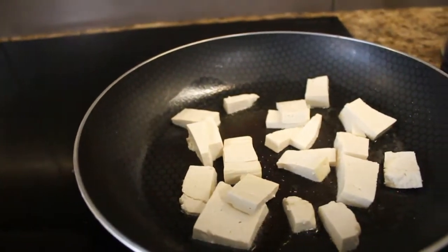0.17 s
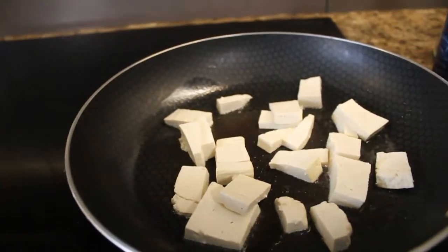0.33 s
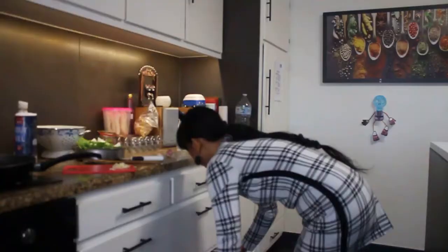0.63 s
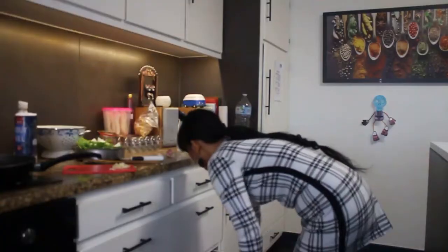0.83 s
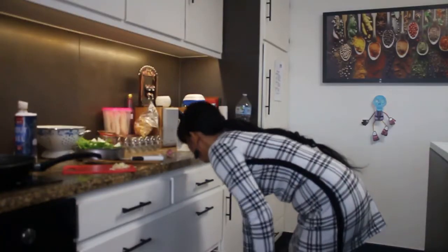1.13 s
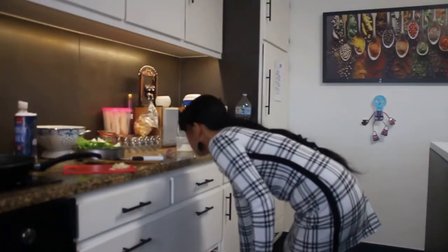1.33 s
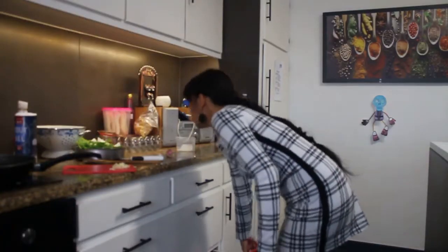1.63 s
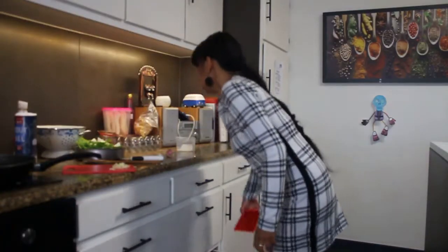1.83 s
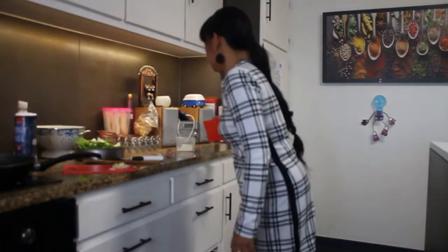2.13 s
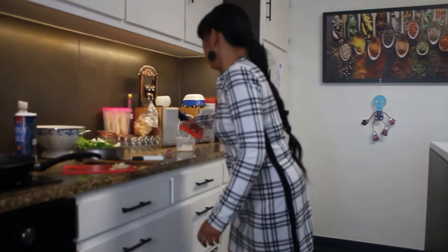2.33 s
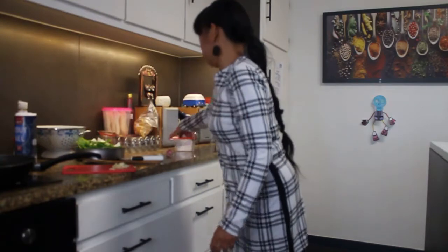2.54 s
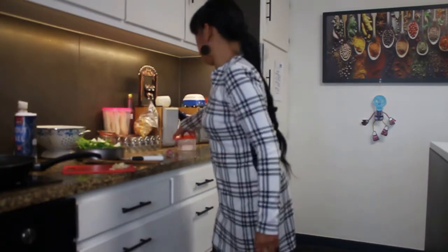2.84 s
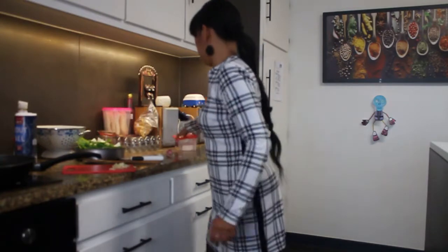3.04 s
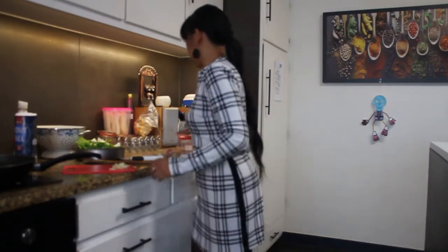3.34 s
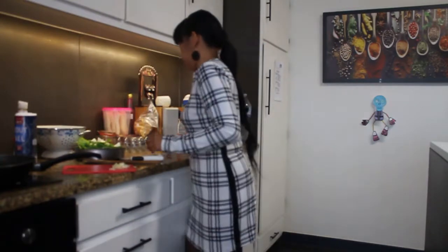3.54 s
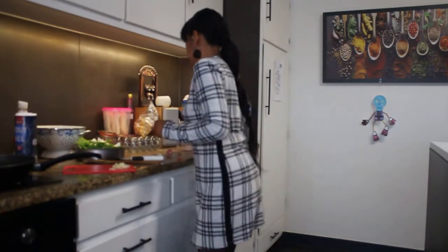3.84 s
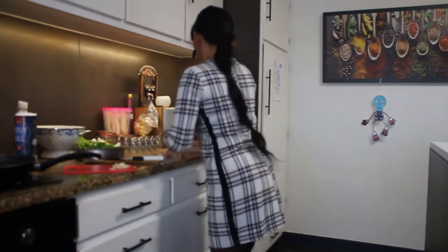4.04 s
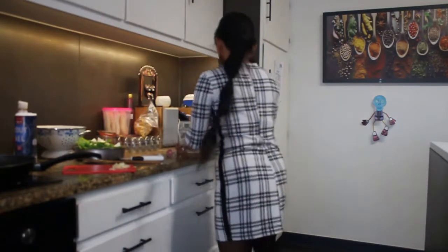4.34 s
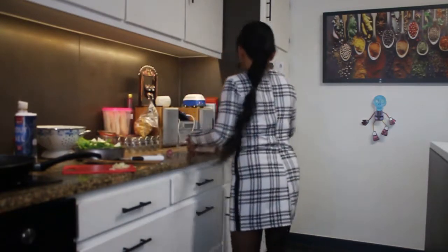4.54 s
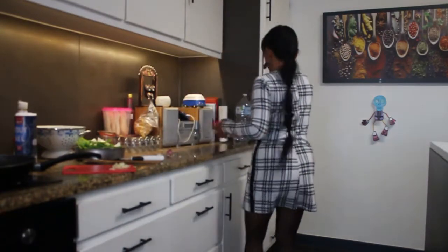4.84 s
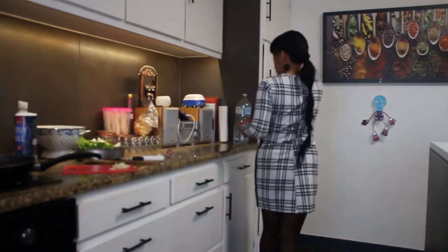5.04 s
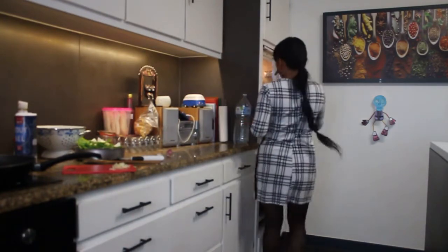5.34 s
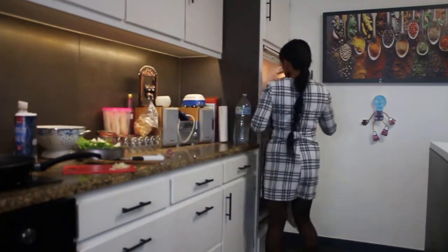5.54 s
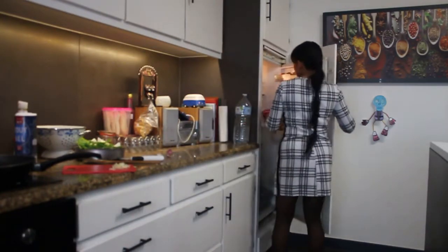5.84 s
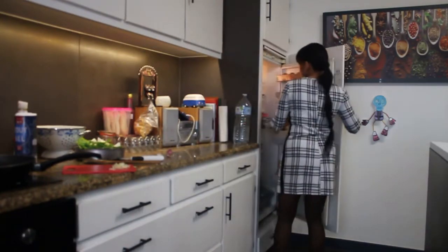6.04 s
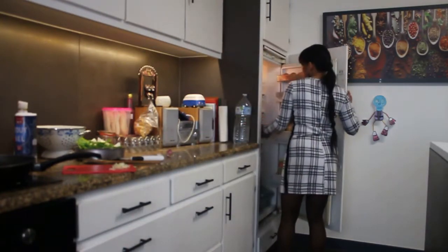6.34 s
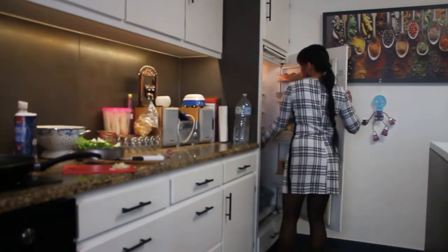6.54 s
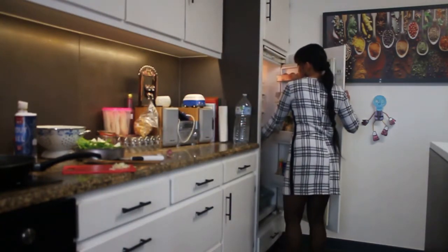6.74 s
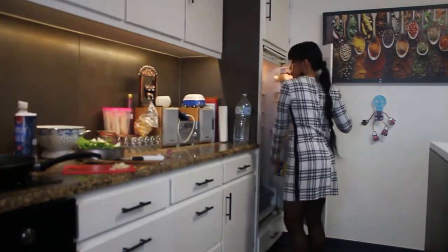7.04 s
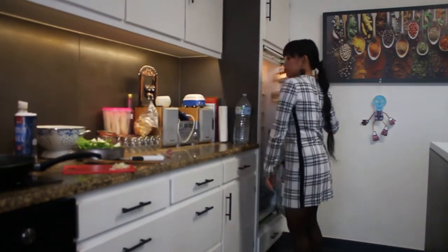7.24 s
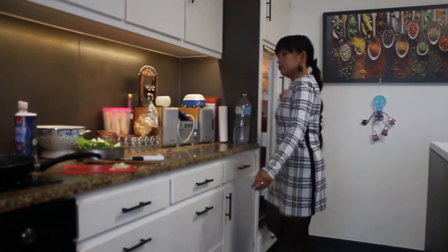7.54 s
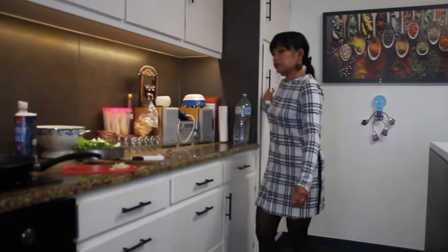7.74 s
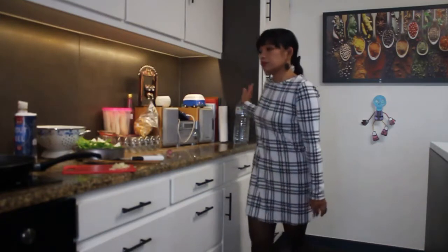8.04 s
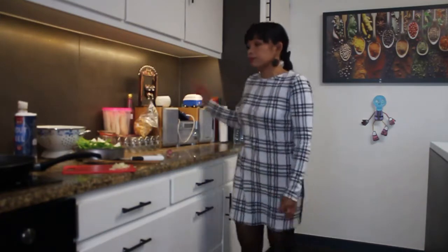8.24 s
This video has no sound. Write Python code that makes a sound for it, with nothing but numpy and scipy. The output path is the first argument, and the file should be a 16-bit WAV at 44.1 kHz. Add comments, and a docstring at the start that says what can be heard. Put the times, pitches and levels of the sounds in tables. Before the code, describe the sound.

Close frying gives way to a soft pan hiss while drawers roll, things clatter on a counter and a refrigerator door thumps shut.

```python
"""A hard-walled kitchen, one microphone feeding both channels. It starts close to tofu frying in oil,
where steam bubbles burst and spit, then the scene jumps to the far side of the room. From there the pan
is a soft hiss. Drawers roll, things are rummaged and set down on ringing wood, cutlery tinkles, and a
refrigerator door is opened and slammed, all echoed by the walls. The refrigerator hums throughout."""
import sys
import numpy as np
from scipy import signal
from scipy.fft import rfft, irfft, next_fast_len
from scipy.io import wavfile

SR = 44100
rng = np.random.default_rng(int(sys.argv[2]) if len(sys.argv) > 2 else 0)


def to_wav(s):
    """Save 16-bit WAV."""
    ch = np.atleast_2d(s).T  # columns
    pcm = np.round(np.clip(ch, -1, 1) * 32767)  # PCM
    wavfile.write(sys.argv[1], SR, pcm.astype(np.int16))


N = 369508
T = np.arange(N) / SR


def from_db(db):
    """Decibels as an amplitude gain."""
    return 10 ** (np.asarray(db) / 20)


def rms_one(x):
    """Scaled to rms 1."""
    return x / np.sqrt(np.mean(x ** 2) + 1e-20)


def peak_one(x):
    """Scaled to peak 1."""
    return x / np.abs(x).max()


def in_time(points):
    """A curve of (time_s, value) read at every sample."""
    return np.interp(T, *np.transpose(points))


def at_hz(points, hz):
    """A curve of (frequency_hz, value) read on a log frequency axis."""
    points_hz, values = np.transpose(points)
    return np.interp(np.log(hz + 1), np.log(points_hz), values)


def equalise(x, spectrum):
    """Filter by a curve of (frequency_hz, gain_db)."""
    size = next_fast_len(N)
    gain = from_db(at_hz(spectrum, np.fft.rfftfreq(size, 1 / SR)))
    return irfft(rfft(x, size) * gain, size)[..., :N]


def colour(x, spectrum):
    """Dense sound shaped by a spectrum; rms 1."""
    return rms_one(equalise(x, spectrum))


def drift(rate_hz):
    """A slow random wander; rms about 1."""
    step, settle = 40, 2000
    pole = np.exp(-2 * np.pi * rate_hz * step / SR)
    noise = rng.standard_normal(N // step + settle + 2)
    slow = signal.lfilter([1], [1, -2 * pole, pole * pole], noise)[settle:]
    return np.interp(np.arange(N) / step, np.arange(len(slow)), rms_one(slow))


def ring(x, hz, t60):
    """One mode: a unit click starts a dying sine of height 1."""
    r, w = from_db(-60 / (t60 * SR)), 2 * np.pi * hz / SR
    return signal.lfilter([0, np.sin(w)], [1, -2 * r * np.cos(w), r * r], x + 1e-18)


def band(x, low_hz, high_hz):
    """Band-pass."""
    return signal.sosfilt(signal.butter(2, [low_hz, high_hz], "band", fs=SR, output="sos"), x)


def noise_band(hz, width_hz):
    """Narrow noise, heard as a wavering tone or rumble; rms 1."""
    return rms_one(band(rng.standard_normal(N), hz - width_hz / 2, hz + width_hz / 2))


def grains(per_s, spread_db):
    """Random clicks of uneven size; rms 1."""
    sizes = from_db(spread_db * np.minimum(rng.exponential(1, N), 5)) * rng.choice([-1, 1], N)
    return rms_one(sizes * (rng.random(N) < per_s / SR))


def burst(t60, size=4000, rise_s=0):
    """Noise that builds up briefly, then dies away."""
    t = T[:size]
    rise = np.minimum((t + 1 / SR) / (rise_s + 1 / SR), 1)
    return rng.standard_normal(size) * rise * from_db(-60 * np.maximum(t - rise_s, 0) / t60)


def add(out, s, sound):
    """Mix a short sound in at s seconds."""
    at = round(s * SR)
    out[at:at + len(sound)] += sound[:N - at]


# The refrigerator's low tone, heard from both positions; the peak near 3.7 s is a low thump that joins it:
# time_s, level_db
HUM_LEVEL = [(0, -54), (.7, -43), (1.1, -74), (2.2, -58), (3.4, -54), (3.7, -33), (4.4, -57.5),
             (5.6, -47.5), (6.6, -52.5), (8.38, -43.5)]


def refrigerator_hum():
    """The compressor gives a wavering low tone and a faint buzz above it."""
    low = from_db(in_time(HUM_LEVEL)) * noise_band(59.3, width_hz=19)
    buzz = from_db(-63) * noise_band(320, width_hz=2.7)
    return low + buzz


# The pan from across the room, slowly calming: time_s, level_db
FAR_PAN_LEVEL = [(0.65, -33), (2.3, -34), (4.1, -36), (8.38, -36)]
# Its hiss and the room noise at that distance: frequency_hz, gain_db
FAR_PAN_SPECTRUM = [(53, -44), (90, -9.5), (266, -4.5), (330, -4.5), (783, -3.5), (1020, -1), (1320, 0),
                    (1820, -3), (2120, -1.5), (3890, 1), (5490, 4.5), (10700, 0), (15900, -7.5)]


def far_pan():
    """Distance blurs the sizzle into a softly flickering hiss over the room noise."""
    hiss = rng.standard_normal(N)
    crackle = grains(per_s=1200 * from_db(5.7 * drift(2.5)), spread_db=5.5)
    level_db = in_time(FAR_PAN_LEVEL) + 1.4 * drift(8.7)
    return from_db(level_db) * colour(hiss + 0.33 * crackle, FAR_PAN_SPECTRUM)


# The decay between the hard walls, before it steepens: frequency_hz, initial_t60_s
KITCHEN_DECAY = [(100, 1), (260, 0.52), (700, 0.64), (1840, 1), (4850, 0.68), (12000, 0.38)]


def kitchen_reverb(x):
    """The walls return a dense tail, dying band by band, just after the direct sound."""
    t, white, tail = T[:SR], rng.standard_normal((2, SR)), 0
    for k, low_hz in enumerate(40 * 2. ** np.arange(0, 8.6, .5)):
        t60 = at_hz(KITCHEN_DECAY, low_hz)
        half_octave = band(white[k % 2], low_hz, np.sqrt(2) * low_hz)
        tail = tail + half_octave * from_db(-60 * t / t60) / np.sqrt(t60)
    tail *= np.clip((t - .004) / 0.0077, 0, 1)   # first reflections arrive after 4 ms
    tail *= from_db(-153 * t ** 2)   # the tail falls faster as it ages
    return from_db(-2) * signal.fftconvolve(x, tail / np.sqrt(np.sum(tail ** 2)))[:N]


# Drawers rolling and things rummaged across the room:
# start_s, length_s, wood_db, fade_db_per_s, rumble_re_wood_db, rattle_re_wood_db, crinkle_re_wood_db
RUMMAGE_BOUTS = [(0.641, 0.17, -24, 15, -16, -8.5, -12.5), (0.831, 0.33, -28, 39, -8, -3.5, -11),
                 (1.2, 0.14, -36.5, -15, -15, -5.5, -24), (1.419, 0.16, -21.5, 57, -27, -6.5, -8),
                 (1.693, 0.036, -42, 13, -23, 4, 5.5), (2.48, 0.2, -30.5, 26, -10, -2, -7),
                 (2.657, 0.49, -25, -1.5, -11, -6, -6), (3.179, 0.19, -25, 17, -10.5, -11, -7.5),
                 (3.375, 0.23, -27, 29, -9, -5.5, -3.5), (3.658, 0.098, -26.5, -17, -31, -6.5, -5),
                 (3.767, 0.21, -27.5, 2, -21, -8.5, -35), (4.216, 0.24, -44, 19, -4, -5, -9),
                 (4.514, 0.23, -42.5, 40, -17, -18, 11), (4.902, 0.13, -56, -92, -2, -8, 7),
                 (5.028, 0.37, -32.5, 30, -4.5, -5, -6), (5.547, 0.072, -30, 90, -17, -0.5, -16),
                 (6.331, 0.14, -53, 32, 12, 0, -1), (6.682, 0.055, -21, 1, -28, -16, -15),
                 (6.792, 0.23, -24.5, 85, -6, -10.5, -24), (7.701, 0.061, -38, -150, -8, -2, -5),
                 (7.79, 0.25, -27, 71, -1, -6.5, -1.5)]


def bout_gains():
    """Gains of wood, rumble, rattle and crinkle: each bout starts quickly, fades or swells, and stops."""
    attack_s, release_db_per_s = 0.0061, 302
    fade_share = np.array([[1], [0.67], [1], [1]])   # the rumble fades more slowly than the rest
    gains = np.zeros((4, N))
    for s, length_s, wood_db, fade_db_per_s, *re_wood_db in RUMMAGE_BOUTS:
        at = round(s * SR)
        age = T[:min(SR, N - at)]
        fade_db = fade_share * fade_db_per_s * np.minimum(age, length_s)
        release_db = release_db_per_s * np.maximum(age - length_s, 0)
        envelope = np.minimum(age / attack_s, 1) * from_db(wood_db - fade_db - release_db)
        gains[:, at:at + SR] += envelope * from_db([0, *re_wood_db])[:, None]
    return gains


# Cabinet and shelf modes, also rung by the knocks: pitch_hz, relative_db, free_t60_s
WOOD_MODES = [(331, -4.5, 0.026), (456, -2, 0.038), (544, 3, 0.05), (574.6, 5, 0.043), (733, 6, 0.015),
              (877, 5.5, 0.024), (976, 5.5, 0.017), (1280, 3, 0.014), (1435, -3.5, 0.034),
              (1860, 1.5, 0.0028)]
# Loose things rattling: frequency_hz, gain_db
RATTLE_SPECTRUM = [(880, -60), (1500, 12), (1880, 9.5), (2270, 10), (3870, 5), (5410, 2), (9130, -34),
                   (10900, -48), (15900, -34)]
# The crisp crinkle among them: frequency_hz, gain_db
CRINKLE_SPECTRUM = [(2500, -6), (4000, 1.5), (5500, 1), (10700, -6.5), (15900, -21)]


def rummage():
    """Dense small contacts ring and rumble in the cabinet wood while loose things rattle and crinkle."""
    wood_gain, rumble_gain, rattle_gain, crinkle_gain = bout_gains()
    contacts = grains(per_s=900 * from_db(5 * drift(22)), spread_db=1.5)
    wood = sum((-1) ** k * from_db(db) * ring(contacts, hz, 0.5 * t60)
               for k, (hz, db, t60) in enumerate(WOOD_MODES))
    rumble = rms_one(band(band(contacts, 66, 299), 72, 400))
    rumble += 0.73 * rms_one(band(ring(contacts, hz=145.6, t60=1.0), 91, 176))
    rattle = colour(grains(per_s=6000 * from_db(4.9 * drift(20)), spread_db=1.0), RATTLE_SPECTRUM)
    crinkle = colour(grains(per_s=2500 * from_db(6.5 * drift(5.4)), spread_db=2.5), CRINKLE_SPECTRUM)
    cabinet = wood_gain * rms_one(wood) + rumble_gain * rms_one(rumble)
    return cabinet + rattle_gain * rattle + crinkle_gain * crinkle


# Cutlery, glass and bright ticks across the room: start_s, peak_db, pitch_hz, t60_s, spread_ratio
TINKLES = [(0.977, -15, 11360, 0.18, 0.0093), (0.981, -24, 9800, 0.11, 0.046),
           (1.259, -25, 5500, .02, 0.055), (0.985, -16, 2200, 0.04, 0.13),
           (1.005, -22.5, 2930, 0.12, 0.069), (1.503, -9, 4620, .02, .2), (1.697, -22, 2680, 0.03, 0.054),
           (2.027, -29, 6200, 0.025, 0.15), (2.799, -19.5, 11000, 0.16, 0.025),
           (2.829, -23, 10200, 0.12, 0.031), (2.90, -30, 13900, .08, .03), (2.946, -19, 8440, .05, 0.036),
           (3.045, -20, 8150, .06, 0.048), (3.075, -23, 10200, .08, 0.034), (3.075, -24, 14600, .12, .03),
           (3.581, -6.5, 9250, 0.0025, 0.39), (2.67, -21, 2260, 0.063, 0.107),
           (3.45, -25, 11300, .1, 0.027), (5.143, -21.5, 10700, 0.045, 0.06), (5.428, -33, 13400, .1, .015),
           (5.03, -23, 5590, 0.17, 0.07), (7.77, -26, 3660, 0.17, 0.039), (7.775, -27, 9600, 0.22, 0.055),
           (7.792, -30, 5870, 0.27, 0.073), (7.9, -27, 2240, 0.31, 0.031), (8.334, -24, 8650, 0.2, 0.067)]


def tinkles():
    """A light touch rings a cluster of close high modes that beat roughly."""
    out = np.zeros(N)
    for s, db, hz, t60, spread in TINKLES:
        contact = burst(0.035 + 0.6 * t60, size=10000, rise_s=0.0023)   # longer ring, longer jostle
        pitches = hz * (1 + spread * np.clip(rng.normal(0, 1, 24), -2, 2))
        add(out, s, from_db(db) * peak_one(sum(ring(contact, pitch, t60) for pitch in pitches)))
    return out


# Knocks and set-downs on wood across the room:
# start_s, body_peak_db, rise_ms, centre_hz, fall_db_per_octave_squared, thud_re_body_db, crack_re_body_db
KNOCKS = [(0.644, -14.5, 0.85, 766, 12, 2, 2), (0.677, -12, 1.96, 500, 14, -7, -14),
          (0.755, -16, 2.8, 695, 15, -15, -17), (0.849, -14.5, 3, 713, 22, -24, -8),
          (0.983, -21, 8.9, 745, 25, -25, 2.5), (1.423, -12, 2.8, 835, 7, -36, -21),
          (1.474, -23, 3.3, 700, 11, -17, 9), (1.504, -17, 2.05, 545, 17, -2, 2),
          (1.696, -24, 5.2, 510, -2, -35, -4), (1.862, -24.5, 0.78, 494, 7, -8, -12),
          (2.357, -16.5, 1.26, 448, 6, -5, -6.5), (2.484, -23.5, 2.5, 770, 15, -20, 0),
          (2.666, -5.5, 1.66, 597, 27, -25, -3), (2.874, -9, 5.2, 530, 17, -26, -7),
          (2.982, -10, 5, 600, 11, -24, 4), (3.202, -8, 3.5, 1000, 41, -22, -4.5),
          (3.364, -15.5, 6.8, 595, 18, -23, -13), (3.578, -1, 6.34, 616, 17, -14.5, -4),
          (3.669, -13.5, 2, 496, 17, -27, -7), (3.781, -11.5, 1.7, 600, 11, 5.5, 5),
          (3.845, -6.5, 3, 650, 5, -12, -13), (3.869, -27, 1.3, 500, 5, -9, -9),
          (3.938, -13, 7.1, 800, 9, -5.5, -7.5), (4.222, -26.5, 2.35, 527, 18, -5, -24),
          (4.373, -27, 3.1, 570, 8, -27, -5), (4.526, -30, 2.37, 877, 15, -31, -3),
          (4.608, -26.5, 2.87, 550, 21, -11, -10), (5.148, -16.5, 14.7, 900, 37, -11, -13),
          (5.526, -4, 0.65, 475, 25, -19.5, -8), (6.465, -33, 3.3, 850, 22, -22, -7),
          (6.673, -4.5, 4.5, 910, 7, -34, -13), (6.786, -3, 4.4, 820, 13.5, -23, -9.5),
          (7.102, -16.5, 1.55, 500, 5, -17, -8), (7.5, -33, 2.25, 580, 35, -33, -22),
          (7.702, -31, 3, 947, 8, -13, -2), (7.764, -13.5, 1.63, 398, 5, -10, -2),
          (7.865, -15, 4.3, 595, 18, -4, -13)]


def knocks():
    """Each blow rings the wood modes near its centre most, with a dull thud below and a crack above."""
    out = np.zeros(N)
    held = .7   # share of the ring time left while the struck thing stays in contact
    for s, db, rise_ms, centre_hz, fall_db, thud_db, crack_db in KNOCKS:
        chatter = burst(t60=0.046, rise_s=rise_ms / 1000)
        blow = 16 * signal.unit_impulse(len(chatter), round(rise_ms * SR / 1000))
        contact = chatter + blow
        spot_db = rng.normal(0, 1.5, len(WOOD_MODES))   # no two spots ring alike
        detune = rng.normal(1, .03, len(WOOD_MODES))
        modes = 0
        for k, (hz, mode_db, t60) in enumerate(WOOD_MODES):
            off_centre_db = max(fall_db, 0) * np.log2(hz / centre_hz) ** 2
            gain = (-1) ** k * from_db(mode_db + spot_db[k] - off_centre_db)
            modes = modes + gain * ring(contact, hz * detune[k], held * t60)
        body = peak_one(band(modes, 205, 2000))   # small things radiate no bass
        thud = peak_one(band(band(contact, 152, 313), 69, 420))
        crack = peak_one(band(band(chatter, 1160, 4600), 1020, 6000))
        add(out, s, from_db(db) * (body + from_db(thud_db) * thud + from_db(crack_db) * crack))
    return out


# The refrigerator door across the room, pulled open, then slammed: start_s, boom_peak_db, seal_peak_db
DOOR_MOVES = [(5.15, -27, -38), (7.766, -8, -3.5)]
# The door's low modes: pitch_hz, relative_db, t60_s
DOOR_MODES = [(40.3, -10.5, 1), (60.4, -7, 0.14), (80.4, 8, 0.15), (189, -6.5, 0.25), (291, -2.5, 0.1),
              (500, 0.5, 0.044)]


def refrigerator_door():
    """The door booms in its low modes while the seal slaps and air hisses out past it."""
    out, blow = np.zeros(N), signal.unit_impulse(27000)
    boom = peak_one(sum(-from_db(db) * ring(blow, hz, t60) for hz, db, t60 in DOOR_MODES))
    for s, boom_db, seal_db in DOOR_MOVES:
        slap = band(band(burst(t60=0.029, rise_s=0.00117), 5300, 14500), 5300, 14500)
        hiss = band(band(burst(t60=0.79, size=27000), 4600, 10500), 4600, 10500)
        add(out, s, from_db(boom_db) * boom)
        add(out, s, from_db(seal_db) * peak_one(slap))
        add(out, s, from_db(seal_db - 17) * peak_one(hiss))
    return out


# The sizzle with the microphone close to the pan: frequency_hz, gain_db
CLOSE_PAN_SPECTRUM = [(88, -65), (150, -48), (222, -15), (285, -19), (334, -23), (447, -7.5), (565, -14.5),
                      (957, -10), (1100, -9), (3820, -6), (5320, -2.5), (10500, -2.5), (15900, -9)]
# Oil spitting near the microphone: start_s, peak_db, pitch_hz
OIL_SPITS = [(0.043, -19, 4580), (0.163, -20, 7200), (0.311, -21, 5380), (0.496, -6, 6800),
             (0.506, -10, 5600), (0.535, -5, 5550), (0.564, -18, 4670), (0.5856, -7, 6300),
             (0.621, -15, 5430)]


def close_pan():
    """Thousands of steam bubbles burst in the oil and ring briefly; a few spit; the burner rumbles."""
    bubbles = grains(per_s=4000 * from_db(4.5 * drift(80)), spread_db=4.0)
    pitches, pitch_index = np.geomspace(1000, 14000, 12), rng.integers(0, 12, N)
    fizz = sum(rms_one(ring(bubbles * (pitch_index == k), hz, t60=7.5 / hz)) * np.sqrt(hz)
               for k, hz in enumerate(pitches))
    sizzle = colour(rms_one(fizz) + 1.04 * rng.standard_normal(N), CLOSE_PAN_SPECTRUM)
    burner = noise_band(50, width_hz=32)
    out = from_db(-22) * sizzle + from_db(-43) * burner
    for s, db, hz in OIL_SPITS:
        spit = ring(burst(t60=0.018, rise_s=0.00091), hz, t60=4.1 / hz)
        add(out, s, from_db(db) * peak_one(band(spit, 800, 16000)))
    return out


def scene():
    """Close to the pan, then the kitchen from across the room."""
    jump_s, crossfade_s = .643, .002
    handling = rummage() + knocks() + tinkles() + refrigerator_door()
    room = handling + kitchen_reverb(handling) + far_pan()
    close = np.clip((jump_s - T) / crossfade_s, 0, 1)
    mono = close * close_pan() + (1 - close) * room + refrigerator_hum()
    return np.tile(mono, (2, 1))


# The microphone's response: frequency_hz, gain_db
MIC_RESPONSE = [(3600, 1.36), (4170, -1), (4450, 1), (5500, 1.5), (11200, -4.5), (11800, -7.5)]


def record(dry):
    """The microphone peaks near 5.5 kHz and dulls the top octave; peaks clip and the very top is cut."""
    clipped = np.clip(equalise(dry, MIC_RESPONSE), -1, 1)
    cutoff_hz = 15900
    return signal.sosfilt(signal.ellip(12, .2, 70, cutoff_hz, fs=SR, output="sos"), clipped)


dry = scene()
out = record(dry)
to_wav(out)
```